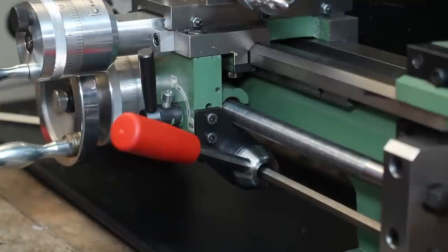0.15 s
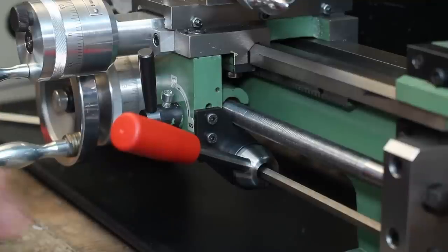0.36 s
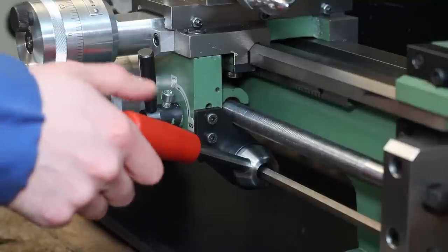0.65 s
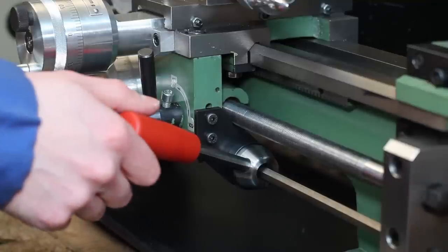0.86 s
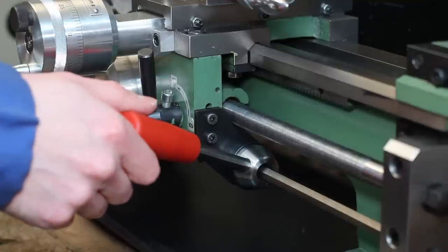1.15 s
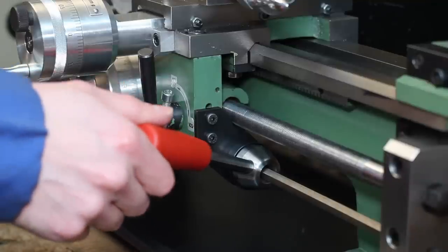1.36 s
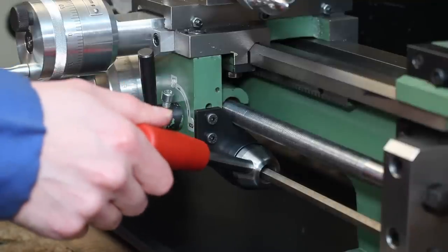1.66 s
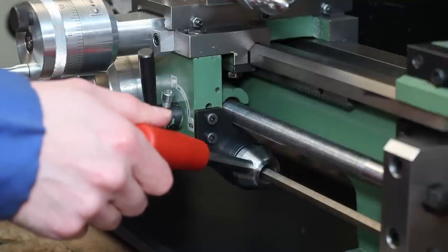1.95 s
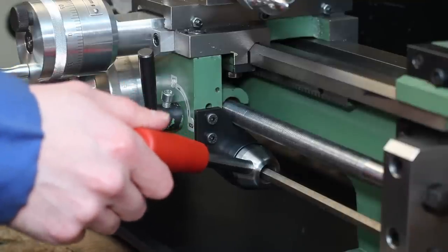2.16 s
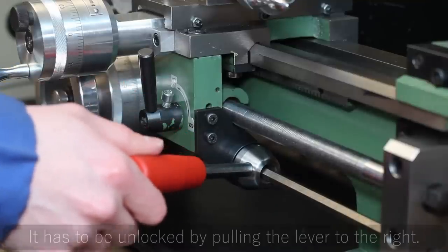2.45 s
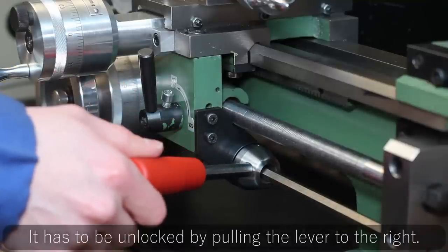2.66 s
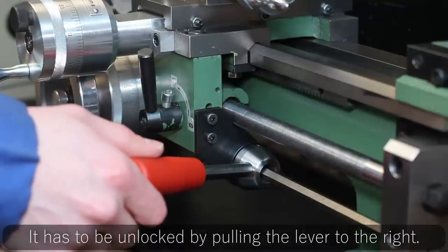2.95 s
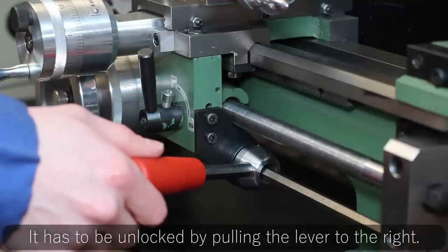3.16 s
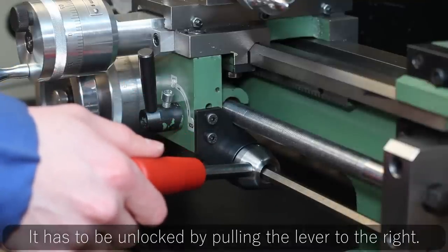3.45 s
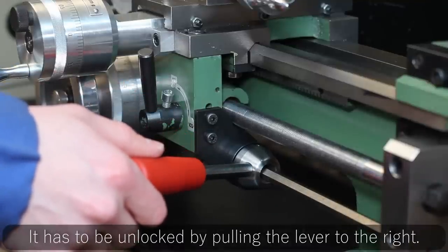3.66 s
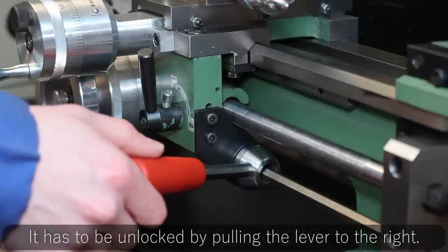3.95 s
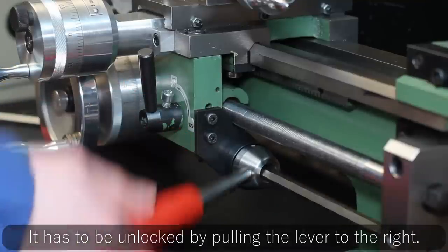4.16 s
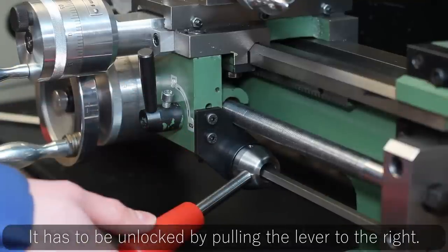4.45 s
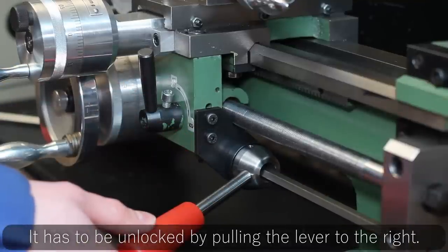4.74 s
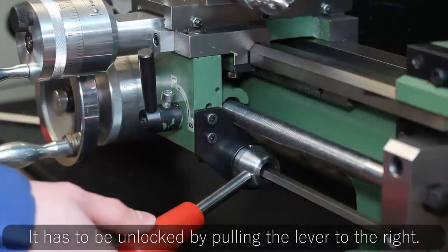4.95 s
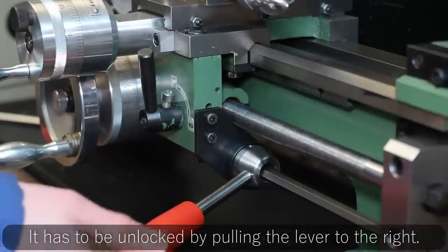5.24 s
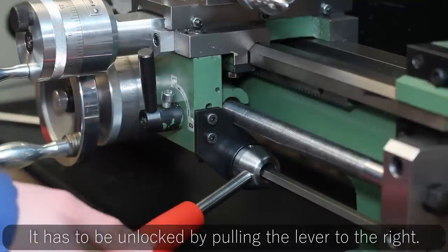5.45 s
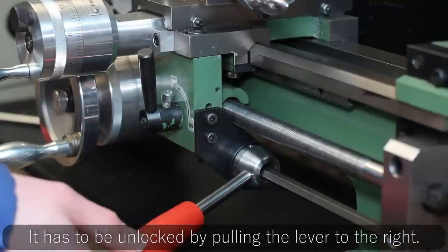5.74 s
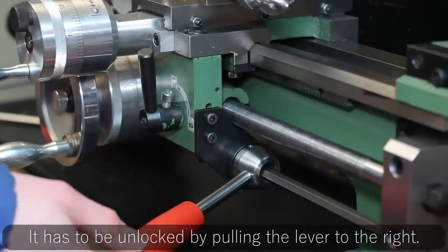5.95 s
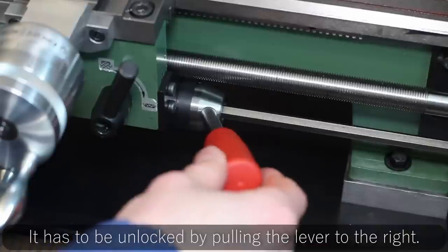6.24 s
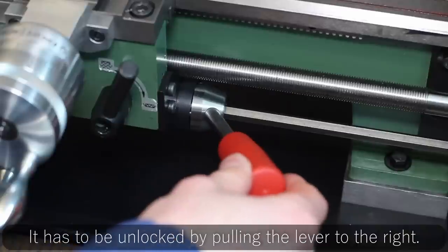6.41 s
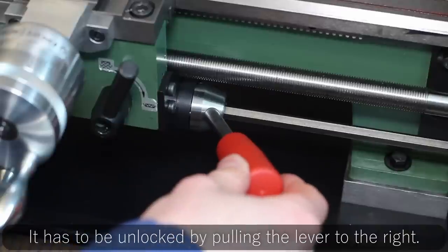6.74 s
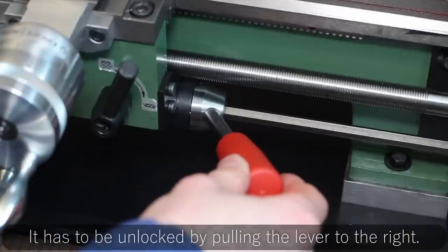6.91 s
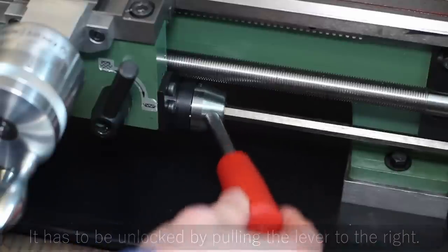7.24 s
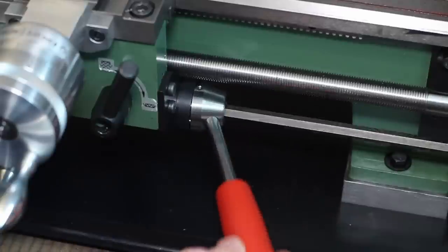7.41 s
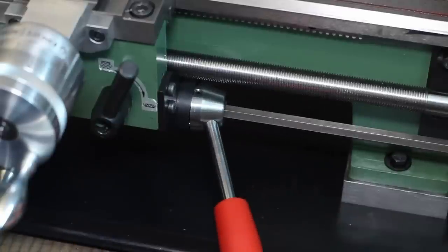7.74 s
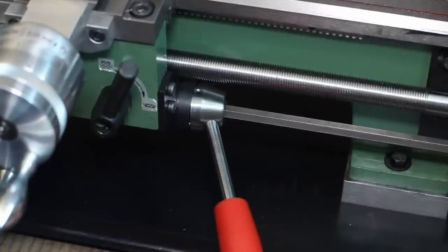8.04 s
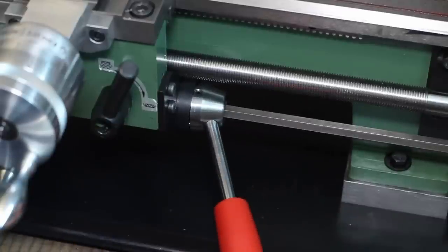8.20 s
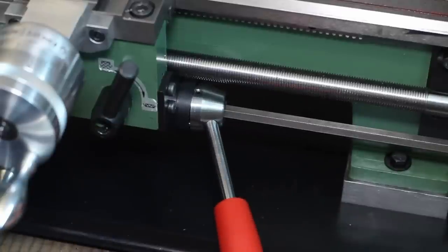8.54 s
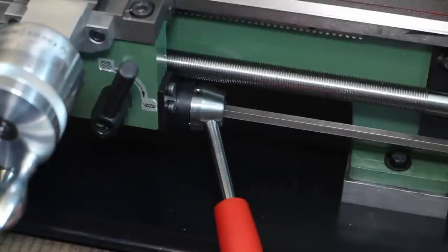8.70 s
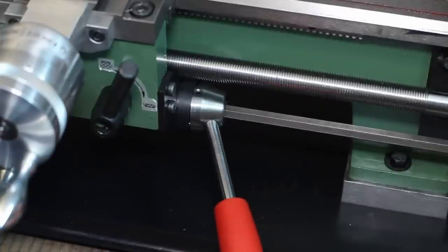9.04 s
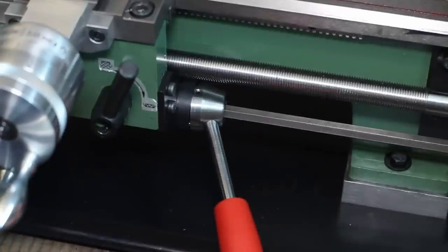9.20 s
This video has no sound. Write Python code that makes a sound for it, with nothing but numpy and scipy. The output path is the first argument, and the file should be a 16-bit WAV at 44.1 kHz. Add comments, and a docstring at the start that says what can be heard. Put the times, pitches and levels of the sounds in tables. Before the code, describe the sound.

Close mono pickup of a bench lathe indoors. Near silence, faint knocks, then sharper lever clacks with a dull rub and thin scrape. The motor starts with a brief hum and howl, overshoots, sags and steadies into a buzzing, rattling whir before an abrupt cut. A short quiet gap with small bumps leads to a second, similar start with different tones and more loose clatter.

```python
"""Small lathe, two starts

A small bench lathe heard from close by in a quiet workshop. A hand moves the control lever with knocks and a
faint scrape; then the motor starts twice, each time overshooting and settling alike. Tooth impacts, a buzzing
shaft and gliding tones make the gears rattle and whine in the iron frame. The sound of the first run breaks off
abruptly; the second has its own tones and frame colour, and more clatter. Noise bursts shaped by steel
resonances make the lever; steady coloured noise makes the workshop."""
import sys
import numpy as np
from scipy.fft import rfft, irfft, next_fast_len
from scipy.io import wavfile
from scipy.ndimage import map_coordinates

SR = 44100
rng = np.random.default_rng(int(sys.argv[2]) if len(sys.argv) > 2 else 0)


def master(y):
    """Save y as 16-bit WAV."""
    cut = np.clip(np.atleast_2d(y).T, -1, 1)
    pcm = np.round(cut * 32767)  # scale
    wavfile.write(sys.argv[1], SR, pcm.astype(np.int16))


N = 413216
TIME = np.arange(N) / SR  # s
FFT_SIZE = next_fast_len(N + 8192, True) // 2 * 2
HZ = np.fft.rfftfreq(FFT_SIZE, 1 / SR)


def amp(db):
    """Decibels to gain."""
    return np.exp(np.asarray(db) * (np.log(10) / 20))


def unit(x):
    """Scale to rms 1."""
    return x / np.sqrt(np.mean(x ** 2) + 1e-20)


def sine(pitch_hz):
    """A sine whose phase accumulates a changing pitch."""
    return np.sin(2 * np.pi * np.cumsum(pitch_hz) / SR)


def wobble(rate):
    """A smooth random curve through normally distributed knots, rate of them a second."""
    knots = rng.standard_normal(2048)
    coarse = TIME[::32]
    return np.interp(TIME, coarse, map_coordinates(knots, [coarse * rate], mode="wrap"))


def colour(points, modes=()):
    """Gain per frequency: a broad (hz, db) slope with (hz, width_hz, db) resonances on it."""
    f, db = np.transpose(points)
    peaks = sum(g / (1 + (2 * (HZ - c) / w) ** 2) for c, w, g in modes)
    return amp(np.interp(np.log(HZ + 1), np.log(f), db) + peaks)


def below(edge_hz):
    """Gain of a steep low-pass."""
    return 1 / np.sqrt(1 + (HZ / edge_hz) ** 12)


def above(edge_hz):
    """Gain of the matching high-pass."""
    return np.sqrt(1 - below(edge_hz) ** 2)


def filtered(x, gain):
    """x through a frequency response."""
    return irfft(rfft(x, FFT_SIZE) * gain)[:N]


def ringing(x, gain):
    """x through the causal response with this gain, so that resonances ring after each impact."""
    cepstrum = irfft(np.log(np.maximum(gain, 1e-6)))
    # folding the cepstrum forward in time gives minimum phase
    cepstrum[1:len(HZ) - 1] *= 2
    cepstrum[len(HZ):] = 0
    return filtered(x, np.exp(rfft(cepstrum)))


def noise(gain):
    """Coloured noise of rms 1."""
    return unit(filtered(rng.standard_normal(N), gain))


def gate(start, stop, rise, fall):
    """1 between start and stop, with straight ramps inside."""
    return np.clip((TIME - start) / rise, 0, 1) * np.clip((stop - TIME) / fall, 0, 1)


def swell(middle, width):
    """A smooth bump of height 1 in time."""
    return np.exp(-np.minimum(((TIME - middle) / width) ** 2, 50))


def blows(times, levels_db, attack, t60, tail_db, tail_t60):
    """Envelope of blows that die quickly and leave a weak room tail."""
    t = np.arange(SR // 2) / SR
    decay = amp(-60 * t / t60) + amp(tail_db - 60 * t / tail_t60)
    shape = (1 - np.exp(-t / attack)) * decay
    power = np.zeros(N + SR)
    for s, db in zip(times, levels_db):
        power[round(s * SR):][:len(t)] += (amp(db) * shape) ** 2
    return np.sqrt(power[:N])


START_A, START_B = 4.24, 7.47  # the motor is switched on (s)
# gear and motor tones of the first run: full_speed_hz, relative level_db
FIRST_TONES = [(98.8, -63.5), (335, -60), (414.5, -47), (500.6, -51.5), (592.6, -41), (699, -51.5),
               (877, -54), (886, -60), (1110, -46.5), (1121, -49), (1330, -54), (1599, -53), (1653, -48),
               (1739, -42), (1943, -74), (2304, -70), (2557, -71), (2794, -55), (2875, -50), (3047, -71),
               (3451, -74)]


def first_run():
    """The motor spins up and runs evenly; its sound breaks off abruptly at 6.03 s."""
    speed, load = spin_up(START_A, torque_db=8.5, uneven_db=1.06)
    body = frame(run=0)
    on = gate(4.232, 6.031, rise=0.035, fall=0.002)
    gears = gear_noise(speed, load, body, on, rumble_db=-44, growl_db=-39.0, rattle_db=-32.5,
                       flutter_db=1.0, hiss_db=-55.5)
    tones = whine(speed, FIRST_TONES, load, body, level_db=-0.95, waver=0.00207, shimmer_db=2.5)
    mesh = howl(speed, START_A, body, flare_db=-23)
    # the jolt is over and the hum already fading when this run becomes audible
    electric = drive(speed, 3.9, whistle_db=-67, hum_db=-48)
    return on * (gears + tones + mesh + electric)


# gear and motor tones of the second run: full_speed_hz, relative level_db
SECOND_TONES = [(98.8, -77), (267, -57.5), (328, -54.5), (414.5, -39), (570.6, -58), (596.5, -48),
                (699.8, -46.5), (888, -53), (1222, -54), (1487, -55), (1658, -47), (1766, -57), (2051, -51),
                (2439, -54), (2702, -58), (2767, -50), (2848, -42.5), (3068, -45), (3338, -51), (3451, -56)]


def second_run():
    """The motor spins up again, with other tones and another balance of frame resonances."""
    speed, load = spin_up(START_B, torque_db=12, uneven_db=1.07)
    body = frame(run=1)
    on = gate(7.455, 10, rise=0.065, fall=.003)
    gears = gear_noise(speed, load, body, on, rumble_db=-42.5, growl_db=-40.5, rattle_db=-30.5,
                       flutter_db=1.0, hiss_db=-53.5)
    tones = whine(speed, SECOND_TONES, load, body, level_db=-1.1, waver=0.00211, shimmer_db=1.5)
    mesh = howl(speed, START_B, body, flare_db=-24)
    electric = drive(speed, 7.49, whistle_db=-67.0, hum_db=-51)
    return on * (gears + tones + mesh + electric)


# every start overshoots, sags and settles alike: after_start_s, speed (share of full speed)
SPEED_CURVE = [(0, .05), (.1, .6), (.175, .96), (.24, 1.03), (.315, 1.038), (.38, 1.0), (.45, .953),
               (.545, .987), (.66, 1.0)]
# the teeth go slack twice as the speed settles: after_start_s, half_width_s, dip_db
SLACK_DIPS = [(0.471, 0.024, 3.5), (0.722, 0.096, 1.5)]
TORQUE_HOLD_S, TORQUE_FADE_S = 0.13, 0.14  # the starting torque holds, then dies away
SHAKE_DB, SHAKE_HOLD_S, SHAKE_FADE_S = 3.5, 0.53, 0.25  # extra rattle until the gear train settles
RATTLE_DB_PER_SPEED = 11.5  # rattle gained from standstill to full speed


def spin_up(start, torque_db, uneven_db):
    """Speed after a start, and the load it puts on the gears: growl and rattle in dB over steady running."""
    age = TIME - start
    speed = np.interp(age, *np.transpose(SPEED_CURVE))
    torque = np.exp(-np.maximum(age - TORQUE_HOLD_S, 0) / TORQUE_FADE_S)
    shake = np.clip(1 - (age - SHAKE_HOLD_S) / SHAKE_FADE_S, 0, 1)
    slack = sum(db * swell(start + s, width) for s, width, db in SLACK_DIPS)
    growl = torque_db * torque - slack + uneven_db * wobble(16)
    speed_loss = RATTLE_DB_PER_SPEED * (1 - speed)
    rattle = SHAKE_DB * shake - speed_loss - slack + uneven_db * wobble(22)
    return speed, (growl, rattle)


def gear_noise(speed, load, body, on, rumble_db, growl_db, rattle_db, flutter_db, hiss_db):
    """Tooth impacts and motor buzz ring the frame; the rattle swells once per turn of the spindle."""
    def level(x):
        """Scale to a spread of 1 while the motor is on."""
        return x / x[on > .5].std()

    growl, rattle = load
    impacts = teeth(speed, mesh_hz=591.8, scatter=.4, spread_db=1, hiss=1.0, worn=.6)
    shaft = amp(-4) * buzz(speed, uneven_db=7)
    turn = 2 * np.pi * np.cumsum(speed) * 27.35 / SR
    flutter = flutter_db * np.cos(turn) + 1.35 * wobble(60)
    # the deep rumble and the hiss of the brushes hardly follow the load
    deep = amp(rumble_db + 0.053 * growl) * level(ringing(impacts, body * below(449)))
    hiss = amp(hiss_db + 0.16 * growl) * np.minimum(speed, 1) * noise(body * above(8400))
    middle = level(ringing(impacts * amp(0.12 * flutter), body * above(485) * below(960)))
    bright = level(ringing((impacts + shaft) * amp(flutter), body * above(1055) * below(9000)))
    return deep + amp(growl + growl_db) * middle + amp(rattle + rattle_db) * bright + hiss


def teeth(speed, mesh_hz, scatter, spread_db, hiss, worn):
    """One impact per gear tooth over rolling noise; worn teeth repeat part of their errors every 43 teeth."""
    at = np.flatnonzero(np.diff(np.floor(np.cumsum(speed) * mesh_hz / SR)))
    wear = np.resize(rng.standard_normal(size=(43, 2)), (len(at), 2))
    chance = rng.standard_normal((len(at), 2))
    share = np.clip(worn, 0, 1)
    late, size = (np.sqrt(share) * wear + np.sqrt(1 - share) * chance).T
    at = np.clip(at + late * scatter * SR / mesh_hz, 0, N - 1).astype(int)
    strength = unit(amp(spread_db * size)) * np.sqrt(SR / mesh_hz)
    hits = np.bincount(at, strength, N)
    return filtered(hits, above(40)) + hiss * rng.standard_normal(N)


def buzz(speed, uneven_db):
    """Brushes and bearings repeat one rough pattern each motor shaft turn: a comb of uneven orders."""
    size = 4096
    strengths = amp(uneven_db * rng.uniform(-0.95, 1, size=90))
    orders = strengths * np.exp(2j * np.pi * rng.random(size=90))
    pattern = irfft(np.pad(orders, (12, 0)), size)  # the lowest 12 bins stay empty
    turns = np.cumsum(98.6 * speed * (1 + 0.0018 * wobble(25))) / SR
    return unit(np.interp(turns % 1, np.arange(size) / size, pattern))


# broad colour of the gear noise: hz, first_run_db, second_run_db
GEAR_COLOUR = [(30, -22, -29), (131, -18, -18), (214, -10.5, -8), (444, -9.5, -1), (764, -14, -6),
               (1530, -7.5, -4), (2350, -5.5, -4.5), (3750, -16.5, -11.5), (4940, -13, -11.5),
               (6780, -18, -15), (8540, -23, -21.5), (10200, -22, -21.5), (15500, -18, -17.5)]
# resonances of the iron frame: hz, width_hz, first_run_db, second_run_db
FRAME_MODES = [(412.7, 21.4, 18.5, 8), (478, 45, 6.5, -8), (578.7, 106, 13.5, 12), (880, 55, 17, 11),
               (1108, 250, 10, 8.5), (1297, 39, 5, 3), (1560, 195, 7.5, 4.5), (1762, 307, 9.5, 10.5),
               (2140, 450, 7.5, 5.5), (2430, 26, 3.5, 7), (2821, 273, 9.5, 16), (3060, 380, 7.5, 2),
               (3483, 460, 7, 6), (3845, 85, 10.5, 8.5), (4650, 1000, 2, 6), (6600, 110, 5, 2.5)]


def frame(run):
    """Resonant response of the iron frame in the first (0) or second (1) run."""
    slope = [(f, dbs[run]) for f, *dbs in GEAR_COLOUR]
    modes = [(f, w, dbs[run]) for f, w, *dbs in FRAME_MODES]
    return colour(slope, modes)


def whine(speed, tones, load, body, level_db, waver, shimmer_db):
    """Tones emerge near full speed, grow with the load and flare as they cross a frame resonance."""
    effort = amp(level_db + 0.29 * load[0]) * np.minimum(speed, 1) ** 4
    out = np.zeros(N)
    for hz, db in tones:
        pitch = hz * speed * (1 + waver * wobble(35))
        flare = np.interp(hz * speed, HZ, body) / np.interp(hz, HZ, body)
        out += amp(db + shimmer_db * wobble(18)) * flare * sine(pitch)
    return np.sqrt(2) * effort * out


# partials of the tooth howl: multiple of the tooth rate (ratio), relative level_db
HOWL_PARTIALS = [(1, 4.5), (1.499, -16), (1.999, 4.5), (3, 0.5), (3.75, -0.5), (3.999, 2.5)]
# swells of howl while the motor overshoots: middle_s, half_width_s, level_db
HOWL_SWELLS = [(4.47, .03, -33.5), (4.61, 0.081, -26), (4.8, 0.054, -29.5), (7.675, .03, -27.5),
               (7.835, 0.087, -26.5), (7.99, 0.066, -38)]
FLARE_S, FLARE_WIDTH_S, FLARE_HZ = 0.205, 0.024, 887  # after the start; half width; at full speed


def howl(speed, start, body, flare_db):
    """Teeth mesh hard in the surge: rough partials glide through frame resonances, and a gear tone flares."""
    partials = np.zeros(N)
    for k, db in HOWL_PARTIALS:
        pitch = 593 * k * speed * (1 + 0.0081 * wobble(90))
        partials += amp(db + 5.7 * wobble(45)) * sine(pitch)
    heard = filtered(partials, body)
    swells = sum(amp(db) * swell(s, width) for s, width, db in HOWL_SWELLS)
    flare = amp(flare_db) * swell(start + FLARE_S, FLARE_WIDTH_S) * sine(FLARE_HZ * speed)
    return swells * heard / heard[speed > .9].std() + flare


def drive(speed, start, whistle_db, hum_db):
    """The controller whistles, its sidebands dropping as speed rises; starting current hums and jolts the bed."""
    carrier = 2 * np.pi * 15662 * TIME
    slots = 2 * np.pi * np.cumsum(speed) * 593 / SR
    whistle = np.sin(carrier) + .5 * np.sin(carrier - slots) + .35 * np.sin(carrier - slots / 2)
    # the hum peaks 0.15 s after start and fades by 30 dB a second on both sides
    surge = amp(hum_db - 30 * np.abs(TIME - start - .15) + 3 * wobble(25))
    hum = surge * np.sin(2 * np.pi * 100 * TIME)
    thump = noise(colour([(40, -26), (125, 26), (220, -37), (400, -16)]))
    jolt = thump * blows([start], [-46], attack=0.016, t60=0.57, tail_db=-29, tail_t60=.4)
    return amp(whistle_db) * whistle + hum + jolt


# loose gears knocking in their backlash: start_s, level_db
GEAR_KNOCKS = [(5.912, -23), (7.669, -17.5), (7.696, -27), (7.753, -34), (8.22, -18.5), (8.288, -23),
               (8.300, -35), (8.364, -21), (8.403, -23.5), (8.465, -22.5), (8.478, -30), (8.551, -23.5),
               (8.626, -26.5), (8.703, -27), (8.745, -30), (8.772, -26.5), (8.848, -22), (8.921, -20.5),
               (8.959, -22.5), (9.027, -20), (9.071, -27), (9.1, -21), (9.134, -25), (9.281, -22)]


def backlash():
    """Loose gears give short bursts of tooth knocks, mostly in the frame's bright resonance."""
    envelope = blows(*np.transpose(GEAR_KNOCKS), attack=0.0017, t60=0.078, tail_db=-14, tail_t60=0.086)
    tilt = colour([(300, -24), (1200, -1.5), (2300, -3.0), (2850, 4.5), (3500, -6.5), (5000, -3),
                   (12000, -10)])
    return envelope * noise(frame(run=1) * tilt)


# brief screeches of steel on steel: start_s, length_s, first_hz, last_hz, level_db
STEEL_SCREECHES = [(4.4, .11, 3120, 2950, -33.5), (7.565, 0.13, 3070, 3160, -28.5)]


def screeches():
    """Sliding steel catches for a moment and gives a rough, gliding tone."""
    out = np.zeros(N)
    for s, length, first_hz, last_hz, db in STEEL_SCREECHES:
        progress = np.clip((TIME - s) / length, 0, 1)
        pitch = first_hz * (last_hz / first_hz) ** progress
        roughness = wobble(330) * np.sqrt(2)
        out += amp(db) * np.sin(np.pi * progress) * roughness * sine(pitch)
    return out


# contacts of the lever and its switch: start_s, knock_db, clack_db, tick_db
LEVER_CONTACTS = [(1.383, -48, -58.5, -68), (1.414, -49, -65, -72), (2.453, -48, -32, -48),
                  (2.525, -42.5, -43, -48.5), (2.822, -58, -44.5, -63), (3.226, -57, -53, -60),
                  (3.287, -43, -42, -68), (4.017, -57, -50, -57), (4.236, -51, -46, -39),
                  (4.258, -30, -41, -32), (6.075, -51, -56, -50), (6.483, -56, -56, -62),
                  (7.385, -49, -32, -50), (7.401, -41, -46, -42), (7.456, -42, -40.5, -38),
                  (7.487, -51, -41, -43)]
# light ticks within the scraping: start_s, tick_db
SCRAPE_TICKS = [(2.619, -58), (3.01, -55.5), (3.106, -59), (3.161, -55), (3.561, -50.5), (3.623, -55.5),
                (3.667, -55.5), (3.735, -56), (3.818, -53.5), (4.072, -53.5), (4.128, -56)]
# broad colour of the lever: hz, level_db
LEVER_COLOUR = [(60, -20), (140, 4), (300, -9), (450, 5.5), (1200, -7.5), (3100, -8), (4000, -8.5),
                (7000, -11), (10000, -24), (15500, -28)]
# resonances of the lever and its rod: hz, width_hz, level_db
ROD_MODES = [(476, 20, 16.5), (568, 33, 10), (670.4, 14, 15), (892, 62, 12.5), (1142, 19, 16),
             (1710, 330, 7), (2160, 210, 2.5), (2720, 90, 5.5), (3100, 240, 4.5), (5070, 180, 8.5)]
TICK_KNOCK_DB, TICK_CLACK_DB = 4, -7.5  # low and middle part of a light tick, relative to its top


def lever():
    """Contacts excite steel: a long low knock, a shorter clack, a brief tick; one leaves the rod humming."""
    light = [(s, db + TICK_KNOCK_DB, db + TICK_CLACK_DB, db) for s, db in SCRAPE_TICKS]
    s, knock_db, clack_db, tick_db = np.transpose(list(LEVER_CONTACTS) + light)
    steel = colour(LEVER_COLOUR, ROD_MODES)
    knock = noise(steel * below(1040))
    knock *= blows(s, knock_db, attack=0.006, t60=0.15, tail_db=-10.0, tail_t60=0.59)
    clack = noise(steel * above(1110) * below(3150))
    clack *= blows(s, clack_db, attack=0.0025, t60=0.14, tail_db=-17.5, tail_t60=0.34)
    tick = noise(steel * above(2720))
    tick *= blows(s, tick_db, attack=0.00029, t60=0.04, tail_db=-9, tail_t60=0.19)
    hum = np.sin(2 * np.pi * 695 * TIME)
    hum *= blows([6.09], [-51], attack=0.013, t60=0.55, tail_db=-30, tail_t60=.4)
    return knock + clack + tick + hum


# soft bumps of the hand on the handle: start_s, level_db
HAND_BUMPS = [(1.387, -51), (1.42, -54), (4.222, -46), (6.484, -46.5), (7.16, -55), (7.35, -52),
              (7.42, -36)]


def hand():
    """The hand bumps the handle softly and stirs only the rod's low resonances."""
    thud = colour([(100, -5), (350, 6), (550, 14), (900, -14), (2000, -26)],
                  [(562, 33, 23), (433, 45, 16)])
    return noise(thud) * blows(*np.transpose(HAND_BUMPS), attack=0.01, t60=0.16, tail_db=-14, tail_t60=0.45)


# colour of the dull rub: hz, level_db
RUB_COLOUR = [(30, -33.5), (80, -14.5), (135, 6.5), (180, -7), (215, -0.5), (300, -14), (430, -9),
              (650, -35)]
# course of the dull rub: time_s, level_db (before the rub's 4 dB trim)
RUB_COURSE = [(1.95, -90), (2.04, -60.5), (2.42, -63.5), (2.44, -56.5), (2.99, -63.5), (3.36, -53.5),
              (3.42, -63), (4.22, -64), (4.25, -52)]
# steady scrape, its drift, and its swell relative to a clack
SCRAPE_DB, SCRAPE_UNEVEN_DB, SCRAPE_PER_CLACK_DB = -54, 1.5, -3


def rubbing():
    """While the lever is held, it rubs dully, then scrapes in small uneven slips, harder for a moment after
    each clack."""
    s, _, clack_db, _ = np.transpose(LEVER_CONTACTS)
    jarred = blows(s, clack_db + SCRAPE_PER_CLACK_DB, attack=0.026, t60=0.31, tail_db=-22, tail_t60=0.54)
    pressure = np.hypot(amp(SCRAPE_DB + SCRAPE_UNEVEN_DB * wobble(22)), jarred)
    slips = rng.standard_normal(N) * amp(3.0 * wobble(70))
    tilt = colour([(200, -9.0), (450, -2.5), (1200, 3.0), (4000, -10.5), (12000, -10)])
    scrape = unit(ringing(slips, colour(LEVER_COLOUR, ROD_MODES) * tilt))
    rub = noise(colour(RUB_COLOUR)) * gate(1.98, 5.5, .04, .04)
    rub_db = np.interp(TIME, *np.transpose(RUB_COURSE)) - 4.0
    return amp(rub_db) * rub + pressure * scrape * gate(2.46, 4.22, 0.028, 0.18)


# colour of the workshop hiss: hz, level_db
ROOM_COLOUR = [(15, -25), (25, -12), (70, -2), (228, -4.5), (275, -7), (333, -3), (498, -4.5), (540, -5),
               (1090, -6), (15700, -18.5)]


def workshop():
    """Steady faint hiss, with a little more rumble and mains hum after the first run."""
    hiss = amp(-63.5) * noise(colour(ROOM_COLOUR) * above(25))
    rumble = amp(-69.0) * noise(colour([(30, -4), (110, -5.5), (160, -9), (600, -12), (2000, -55)]))
    mains = amp(-77.5 + 1.8 * wobble(3)) * np.sin(2 * np.pi * 100 * TIME)
    return hiss + (rumble + mains) * gate(6.03, 10, 0.009, .01)


def scene():
    """Sum all sources into one channel."""
    machine = first_run() + second_run() + backlash()
    handling = screeches() + lever() + hand() + rubbing()
    return (machine + handling + workshop())[None]


TOP_HZ = 15820


def record(dry):
    """A sharp band limit: nothing passes from TOP_HZ upwards."""
    return np.array([filtered(x, HZ < TOP_HZ) for x in dry])


dry = scene()
out = record(dry)
master(out)
```